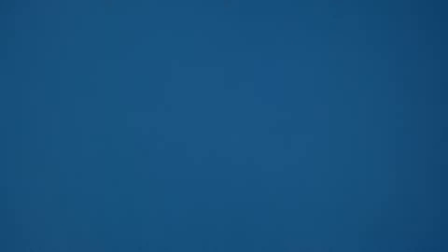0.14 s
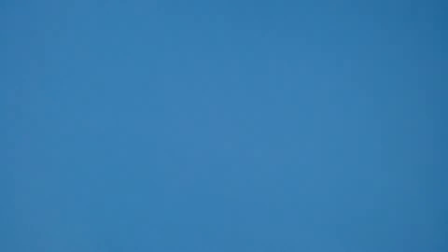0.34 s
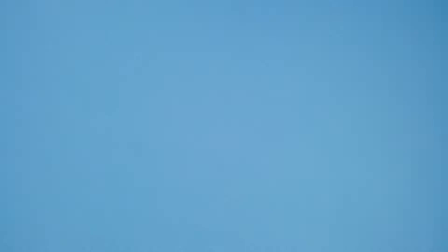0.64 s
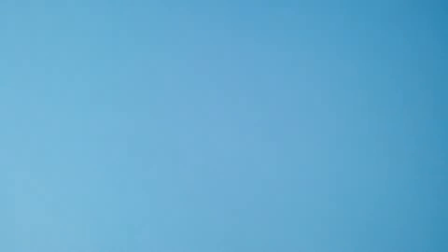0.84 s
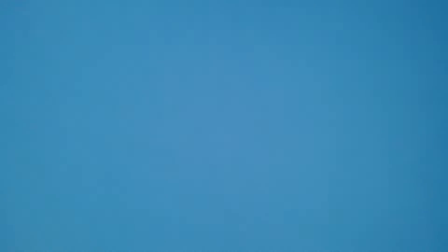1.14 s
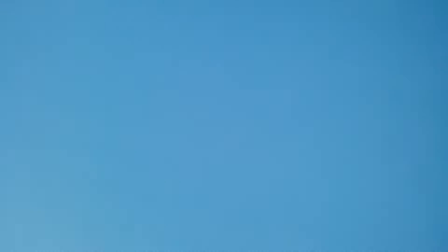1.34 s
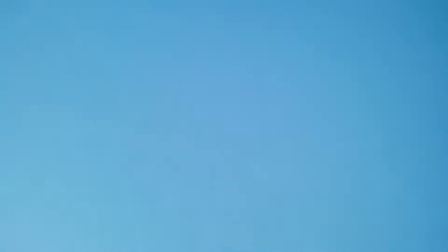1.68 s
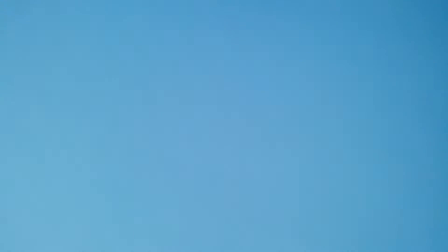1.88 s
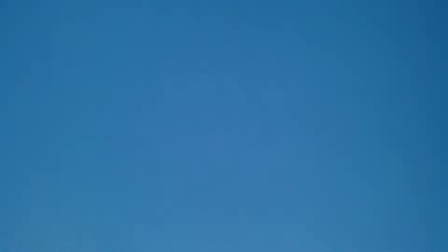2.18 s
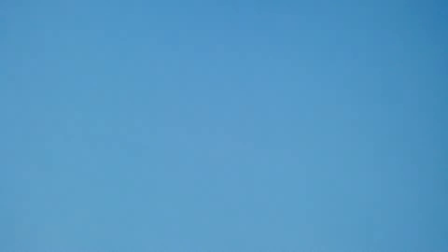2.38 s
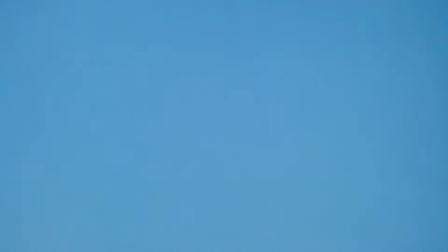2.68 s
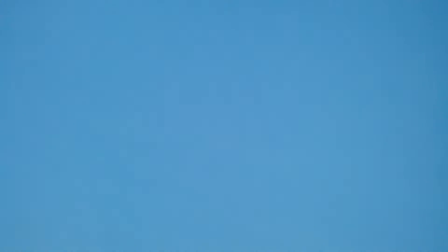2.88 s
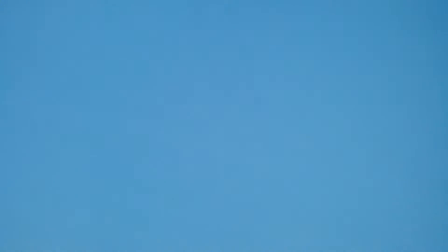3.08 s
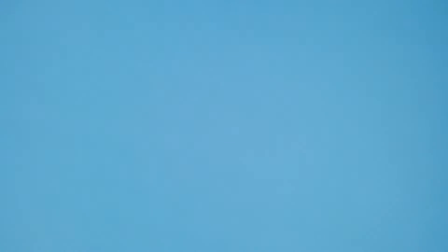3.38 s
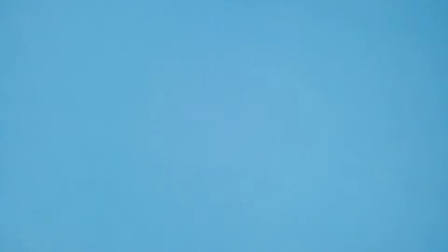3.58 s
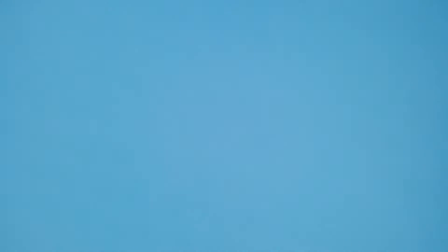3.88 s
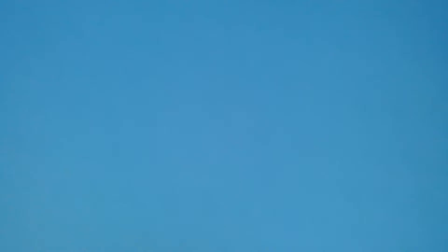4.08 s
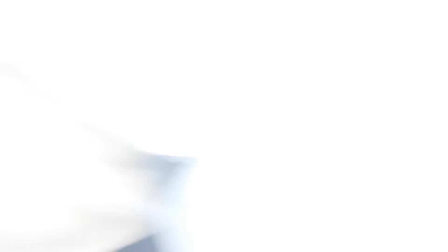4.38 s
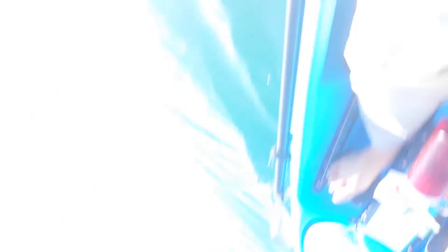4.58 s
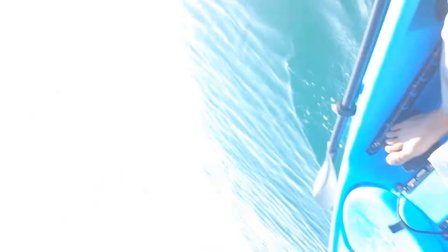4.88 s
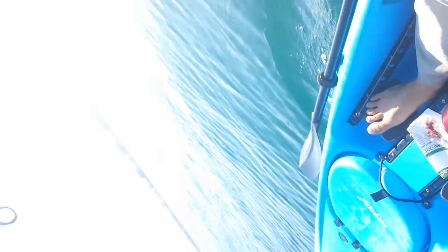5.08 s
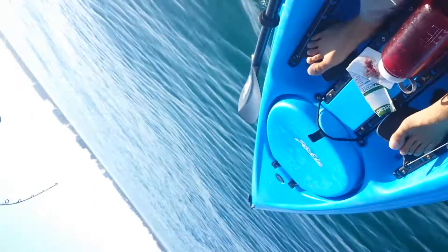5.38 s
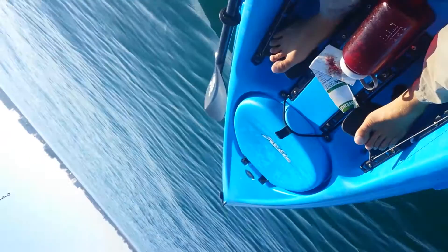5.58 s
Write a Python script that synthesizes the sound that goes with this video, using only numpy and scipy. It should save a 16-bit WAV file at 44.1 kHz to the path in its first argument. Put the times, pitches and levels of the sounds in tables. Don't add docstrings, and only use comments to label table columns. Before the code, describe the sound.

Extremely close handling noise on a waterproof camera: harsh gritty rubbing, sharp cracks and wavering squeaks, a quieter spell, a boomy knock, then another hard squealing stroke. A louder hull thud and a flurry of bumps and reel ticks follow. When the camera is swung clear, the rubbing stops and a fishing reel buzzes briefly, rests, then speeds up again over faint sea rumble. Left microphone dull, right bright.

```python
import sys
import numpy as np
from scipy import signal
from scipy.io import wavfile
from scipy.ndimage import uniform_filter1d

SR = 44100
rng = np.random.default_rng(int(sys.argv[2]) if len(sys.argv) > 2 else 0)


def to_wav(s):
    ch = np.atleast_2d(s).T
    pcm = np.round(np.clip(ch, -1, 1) * 32767)
    wavfile.write(sys.argv[1], SR, pcm.astype(np.int16))


def ratio(d):
    e = np.asarray(d, float) / 20
    return 10 ** e


N = 252894
LIFTED_S = 4.45

# centre in Hz, width in Hz, level in dB.
HOUSING = [(5050, 780, -0.5), (7160, 370, 6), (8650, 1200, 8.5), (9870, 640, 11), (11300, 1400, 3.5),
           (13400, 720, 5.5)]
# frequency in Hz, left minus right in dB.
RUB_LEAN = [(60, -22), (130, 3.5), (290, 32.5), (640, 0), (1410, 7.5), (3100, 11), (6820, -3.5),
            (15000, -33)]
# frequency in Hz, left minus right in dB.
REEL_LEAN = [(290, 12.5), (640, -9.5), (1410, 13.5), (3100, 17), (4600, 17), (5500, 5.5), (6820, -7),
             (15000, -12)]


def evened(x):
    return x / np.sqrt(np.mean(x ** 2) + 1e-20)


def wander(smooth, shape=N):
    return evened(uniform_filter1d(rng.standard_normal(shape), size=smooth))


def read(points, hz):
    f, value = np.transpose(points)
    return np.interp(np.log(hz + 1), np.log(f + 1), value)


def curves(rows, t):
    s, *columns = np.transpose(rows)
    return [np.interp(t, s, c) for c in columns]


def together(*levels_db):
    return 10 * np.log10(sum(ratio(2 * db) for db in levels_db) + 1e-12)


def add(mix, s, sound):
    part = mix[:, round(s * SR):][:, :sound.shape[1]]
    part += sound[:, :part.shape[1]]


def sides(pan_db):
    lean = ratio(np.array([pan_db, -pan_db]) / 2)
    return lean / np.sqrt((lean ** 2).mean(0))


def colour(x, tone, balance, peaks=()):
    hz = abs(np.fft.fftfreq(2048, 1 / SR))
    resonances = sum(ratio(db) / (1 + (2 * (hz - f) / w) ** 2) for f, w, db in peaks)
    gain = ratio(read(tone, hz)) * (1 + resonances)
    log_gain = np.log(gain * sides(read(balance, hz)) + 1e-5)
    taps = np.fft.ifft(np.exp(np.conj(signal.hilbert(log_gain)))).real[:, :1024]
    return signal.oaconvolve(x, taps / np.sqrt(np.mean(gain ** 2)), axes=1)[:, :N]


def grit(per_s, spread_db, smooth):
    size = ratio(spread_db * np.minimum(rng.exponential(1, N), 4)) * (rng.random(N) < per_s / SR)
    burst = signal.lfilter([1], [1, -.93], size)
    return evened((evened(burst) + smooth) * rng.standard_normal((2, N)))


def patchy(x, depth_db, sway_db=0):
    hz, _, z = signal.stft(x, SR, nperseg=512)
    field = rng.standard_normal((z.shape[2], z.shape[1])).T
    field = evened(uniform_filter1d(uniform_filter1d(field, size=6, axis=0), size=9, axis=1))
    grasp, damp = wander(10, (2, z.shape[2]))
    off = (hz[:, None] - HOUSING[0][0]) / 800
    sway = (1.6 * off * grasp + .6 * damp) * np.exp(-off ** 2)
    return signal.istft(z * ratio(depth_db * field + sway_db * sway), nperseg=512)[1][:, :N]


def rub(scrape_db):
    # frequency in Hz, level in dB per Hz.
    rub_tone = [(500, -16), (875, -15), (1900, -12), (2400, -17.5), (3270, -15.5), (5110, 0), (7860, -8),
                (14500, -3)]
    # time in seconds, pressure in dB.
    drags = [
        [(.14, -56), (.2, -33), (.4, -37), (.664, -30), (.84, -36), (.98, -25), (1.14, -33), (1.2, -53)],
        [(1.17, -88), (1.3, -42.5), (1.38, -37), (1.46, -41), (1.6, -61)],
        [(2.52, -105), (2.7, -49.5), (2.8, -35.5), (2.97, -35.5), (3.15, -31), (3.21, -32), (3.39, -31.5),
         (3.415, -65)],
    ]
    # time in seconds, pressure in dB.
    hand_rest = [(0, -51), (1.2, -37), (1.8, -52), (2.14, -46.5), (2.45, -49.5), (2.5, -54.5), (3.3, -41.5),
                 (3.45, -44), (3.8, -49), (3.9, -49), (4.44, -46.5), (4.48, -85), (4.575, -94)]
    drag_bright_db, hand_bright_db, scrape_bright_db = 0.5, -7, -15
    body_level_db, body_share = -42.5, 0.72
    hand_body_db = 3
    hand_left_db = 5.5

    t = np.arange(N) / SR
    scrape_db = scrape_db + 1.1 * wander(130)
    drag_db = together(*(np.interp(t, *np.transpose(r), left=-120, right=-120) for r in drags))
    grip_db = curves(hand_rest, t)[0]
    hand_db = together(grip_db, scrape_db)
    press_db = together(drag_db, hand_db)
    bright_db = together(drag_db + drag_bright_db, grip_db + hand_bright_db, scrape_db + scrape_bright_db)
    bright_db -= press_db
    body_db = np.minimum(body_level_db + body_share * (press_db + 33) - press_db, 8)
    body_db += together(drag_db, hand_db + hand_body_db) - press_db
    flutter_db = 1.27 * wander(500)

    friction = grit(per_s=170, spread_db=33.0, smooth=12.0)
    sound = patchy(colour(friction, rub_tone, RUB_LEAN, HOUSING), 3.48, sway_db=2)
    body = signal.sosfilt(signal.butter(4, 3000, "low", fs=SR, output="sos"), sound)
    middle = signal.sosfilt(signal.butter(4, [3000, 7000], "band", fs=SR, output="sos"), sound)
    bright = signal.sosfilt(signal.butter(4, 7000, "high", fs=SR, output="sos"), sound)
    mix = evened(middle) + ratio(bright_db + 2.5) * evened(bright) + ratio(body_db + 0.48) * evened(body)
    covered = ratio([[0], [-hand_left_db]] * ratio(2 * (hand_db - press_db)))
    return ratio(press_db + flutter_db + 2.0) * covered * mix * (t < hand_rest[-1][0])


def scuffs(t):
    # start in seconds, length in seconds, place of the peak 0-1, scrape in dB, thump in dB.
    moves = [(0, 0.058, 0, -30, -27.5), (0.094, 0.032, 0.43, -36.5, -39), (0.248, 0.11, 0.88, -29, -42),
             (0.357, 0.024, 0.84, -27, -39.5), (1.657, 0.11, 0.5, -50.5, -50),
             (1.707, 0.038, 0.4, -63, -43), (2.184, 0.039, 0, -28, -29.5), (2.207, 0.075, 0.26, -39, -39),
             (2.267, 0.047, 0.86, -34, -63), (2.304, 0.078, 0.68, -32, -43), (2.373, 0.069, 0.85, -36, -63),
             (3.82, 0.052, 0.82, -34, -74), (3.887, 0.07, .6, -40.5, -67), (3.954, 0.078, 0.04, -36, -38),
             (4.019, 0.074, 0.76, -26.5, -22.5), (4.089, 0.18, 0.19, -25, -29.5),
             (4.198, 0.056, 0.85, -22, -24), (4.246, 0.11, 0.4, -34.5, -32.5),
             (4.325, 0.057, 0.48, -27.5, -29.5), (4.405, 0.064, 0.75, -41.5, -38),
             (4.499, 0.031, 0.17, -50, -42.5)]
    roundness = 1.27
    scrape, thump = np.zeros((2, len(t))) + 1e-12
    for start, length, peak, scrape_db, thump_db in moves:
        corners = start + length * np.array([0, np.clip(peak, .02, .98), 1])
        power = np.sin(np.pi / 2 * np.interp(t, corners, [0, 1, 0])) ** (2 * roundness)
        scrape += power * ratio(2 * scrape_db)
        thump += power * ratio(2 * thump_db)
    return 10 * np.log10([scrape, thump])


def squeak(rows):
    t = np.arange(rows[0][0], rows[-1][0], 1 / SR)
    hz, db = uniform_filter1d(curves(rows, t), size=300, mode="nearest")
    wobble, grip = wander(120, len(t)), wander(170, len(t))
    turns = np.cumsum(hz * (1 + .02 * wobble)) / SR
    octave = .1 + 3.2 / (1 + ((2 * hz - 5150) / 450) ** 2)
    octave += .3 * np.clip(np.gradient(hz) * SR / 12000, 0, 1)
    half = 0.39 / (1 + ((hz - 2650) / 250) ** 2)
    tone = np.sin(2 * np.pi * turns) + octave * np.sin(4 * np.pi * turns) + half * np.sin(np.pi * turns)
    tone += (.12 + half) * np.sin(3 * np.pi * turns)
    tone += half * np.sin(5 * np.pi * turns)
    tone += .3 * np.sin(2 * np.pi * 1.14 * turns) * (wobble > -.3)
    level = ratio(db + 3.5 * np.minimum(grip, 1.5) - 8 * np.clip(-grip - .5, 0, 1))
    return rows[0][0], sides(17.0)[:, None] * level * tone * signal.windows.tukey(len(t), .05)


def snap(s, db, hz):
    # centre in Hz, left minus right in dB.
    snap_lean = [(1900, 18), (5000, 8), (9000, -31.5)]
    crack = .4 * rng.standard_normal((2, 500)) * ratio(-60 * np.arange(500) / SR / .005)
    crack[:, 0] = 1
    band = [min(hz / 2.6, 2200), min(hz * 1.8, 12000)]
    wide = signal.lfilter(*signal.butter(2, band, "band", fs=SR), crack)
    ring = signal.lfilter(*signal.iirpeak(min(hz, 15000), 2.5, SR), crack)
    both = ring + .22 * wide
    return s + .0007, sides(read(snap_lean, hz))[:, None] * ratio(db + 4) * both / abs(both).max()


def knock(s, db, hz, t60, pan_db):
    # ratio to the ring, level in dB, share of the decay time.
    hull_modes = [(1, 14, 0.42), (2.1, -2, 0.4), (4.1, -28.5, 0.11), (7, -34.5, 0.28), (11, -13, 0.244)]
    dull_db_per_khz = 5.0
    t = np.maximum(np.arange(6000) / SR - np.array([[.0004], [0]]), 0)
    settle, contact = (.63, .58) if hz < 125 else (.97, .08)
    turns = settle * hz * t + contact * (1 - np.exp(-2.4 * hz * t))
    bend = 1.6 if hz < 200 else 1
    ring = 0
    for k, mode_db, share in hull_modes:
        fade_db = 60 * (t / (t60 * share)) ** bend
        ring = ring + ratio(mode_db - dull_db_per_khz * k * hz / 1000 - fade_db) * np.sin(2 * np.pi * k * turns)
    seat = 1 - np.exp(-9 * hz * t)
    way = -1 if hz > 400 else 1
    return s, way * sides(pan_db)[:, None] * ratio(min(db - 2.5, -2.2)) * ring * seat


def pawl_hits():
    # time in seconds, peak in dB.
    creep = [(3.765, -1.5), (3.797, -3.5), (3.84, -2.5), (4.104, -6), (4.1157, -5.5), (4.124, -17.5),
             (4.1297, -5.5), (4.136, -3.5), (4.1433, -4.5), (4.1505, -7), (4.1565, -5), (4.1659, -14),
             (4.1766, -14), (4.1857, -5.5), (4.2005, -17), (4.219, -5), (4.234, -22.5), (4.2505, -7),
             (4.268, -5), (4.2875, -6.5), (4.3095, -5), (4.404, -11.5)]
    # time in seconds, peak in dB.
    creep_after = [(4.5808, -17), (4.5948, -14), (4.602, -15), (5.2649, -21.5), (5.28, -17), (5.296, -19.5),
                   (5.309, -19), (5.32, -13), (5.33, -20), (5.337, -15.5), (5.3462, -15), (5.355, -18.5),
                   (5.3625, -15.5), (5.3697, -16), (5.378, -16), (5.386, -14), (5.392, -16), (5.398, -20),
                   (5.4013, -12.5), (5.41, -15), (5.4217, -15), (5.4321, -15.5), (5.443, -24),
                   (5.4593, -17), (5.4743, -32), (5.4777, -24), (5.495, -15), (5.508, -13.5),
                   (5.521, -16.5), (5.5312, -11), (5.5399, -14.5), (5.547, -8.5), (5.5547, -13.5),
                   (5.6406, -13), (5.6477, -16.5), (5.6577, -15), (5.6789, -18), (5.688, -28), (5.695, -39)]
    # time in seconds, peak in dB.
    running = [(4.6083, -13), (4.6132, -13), (4.6179, -11), (4.6227, -13), (4.6267, -9), (4.6335, -11),
               (4.6381, -13), (4.6441, -14), (4.6506, -15), (4.6556, -9), (4.6615, -4), (4.6663, -8),
               (4.6717, -10), (4.6768, -9), (4.6819, -10), (4.6869, -14), (4.6921, -10), (4.7024, -10),
               (4.7074, -7), (4.7127, -9), (4.7168, -12), (4.7228, -14), (4.7258, -19), (4.7292, -17),
               (4.7333, -13), (4.7367, -15), (4.7444, -15), (4.749, -17), (4.7545, -20), (4.7586, -16),
               (4.7642, -14), (4.7695, -15), (4.7763, -23), (4.782, -24), (4.7884, -31), (4.792, -25),
               (5.5601, -16), (5.5653, -16), (5.5698, -12), (5.5745, -13), (5.5788, -12), (5.5829, -11),
               (5.5908, -14), (5.5946, -14), (5.5985, -16), (5.604, -15), (5.6082, -11), (5.6127, -15),
               (5.6169, -11), (5.6222, -14), (5.6273, -11), (5.6325, -16), (5.636, -22)]
    hits = np.zeros(N)
    for s, db in creep + creep_after + running:
        hits[round(s * SR)] = ratio(db)
    return hits


def clicker(hits):
    # frequency in Hz, level in dB per Hz.
    tone_before = [(1180, -79), (2000, -23.5), (4420, -14), (5190, -4.5), (7450, 1), (8240, -7.5),
                   (10800, 3.5), (15000, -11.5)]
    tone_after = [(1350, -87), (2300, -31.5), (3950, -11.5), (4700, -1.5), (6630, 0.5), (7460, 4.5),
                  (9080, -3), (14500, -3)]
    # frequency in Hz, left minus right in dB.
    lean_before = [(60, -26), (240, -21.5), (950, 12.5), (3770, 6), (15000, -40.5)]
    # frequency in Hz, level in dB, t60 in seconds, left minus right in dB.
    spool_modes = [(5215, -25.5, 0.028, 4.5), (7710, -31, 0.044, -10.5), (7240, -28, 0.032, -7.5),
                   (2930, -47, 0.05, 10.5), (3750, -47.5, .025, 10.5)]
    t = np.arange(12000) / SR
    bounced = hits + .35 * np.roll(hits, 150) + .1 * np.roll(hits, 390)
    shape = .6 * ratio(-60 * t / .004) + .6 * ratio(-60 * t / .01) + .08 * ratio(-60 * t / .022)
    shape += 0.0014 * ratio(-60 * t / .5)
    shape *= 1 - np.exp(-t / .0003)
    rattle = signal.oaconvolve(bounced, shape)[:N] * rng.standard_normal((2, N))
    after = np.arange(N) > LIFTED_S * SR
    out = ratio(-8.0) * colour(rattle * ~after, tone_before, lean_before)
    out += ratio(1.0) * colour(rattle * after, tone_after, REEL_LEAN)
    for hz, db, t60, pan_db in spool_modes:
        struck = rattle * np.where(after, 1, 0.029 * (pan_db < 0))
        mode = ratio(db - 60 * t / t60) * np.sin(2 * np.pi * hz * t)
        out += sides(pan_db)[:, None] * signal.oaconvolve(struck, mode[None], axes=1)[:, :N]
    return out


def rings(hits):
    # frequency in Hz, level in dB, t60 in seconds, left minus right in dB.
    long_modes = [(4480, -24.5, 0.31, 23), (7300, -30.5, .2, -18)]
    fill_s = .035
    growth = .8
    t, out = np.arange(N) / SR, np.zeros((2, N))
    struck = hits * np.where(t > LIFTED_S, 1, .02)
    driven = np.minimum(uniform_filter1d(1. * (hits > 0), size=600) * 300, 1)
    for hz, db, t60, pan_db in long_modes:
        store = ratio(-120 * t[:20000] / t60) * (1 - np.exp(-t[:20000] / fill_s))
        energy = abs(signal.oaconvolve(struck, store)[:N])
        shake, swell = evened(uniform_filter1d(rng.standard_normal((2, N)), size=450, axis=1))
        tone = np.sin(2 * np.pi * np.cumsum(hz + 45 * driven * shake) / SR)
        tone *= ratio(db + 4 * driven * np.minimum(swell, 1))
        heard = np.where(t > LIFTED_S, 1, pan_db < 0)
        out += sides(pan_db)[:, None] * energy ** growth * tone * heard
    return out


def line(hits):
    # time in seconds, level in dB.
    runs = [
        [(4.57, -66), (4.58, -50), (4.612, -39.5), (4.758, -32), (4.83, -68)],
        [(5.252, -51), (5.262, -38), (5.383, -32), (5.477, -40.5), (5.6, -33.5), (5.707, -53), (5.72, -86)],
    ]
    # frequency in Hz, level in dB per Hz.
    whirr_tone = [(600, -61.5), (807, -45.5), (900, -6.5), (1200, -12), (1720, 0.5), (2180, -19.5),
                  (3120, -17), (5280, -120)]
    pulse = 0.34
    t = np.arange(N) / SR
    friction = grit(per_s=360, spread_db=1.5, smooth=2.5)
    whirr = evened(patchy(colour(friction, whirr_tone, REEL_LEAN), 3.7))
    jolt = signal.oaconvolve(1. * (hits > 0), ratio(-60 * t[:2000] / 0.028))[:N]
    whirr = whirr * (1 - pulse + 2 * pulse * jolt)
    return whirr * sum(ratio(curves(r, t)[0] - 1.0) * (t > r[0][0]) * (t < r[-1][0]) for r in runs)


def sea(thump_db):
    # frequency in Hz, level in dB per Hz.
    rumble_tone = [(18, -8), (30, -13), (85, 0.5), (200, -4.5), (300, -13.5), (600, -41.5)]
    slosh_tone = [(150, -16), (300, 0), (480, -10.5), (700, -9.5), (1200, -27)]
    hiss_tone = [(290, -35.5), (500, -9.5), (1350, -9), (1720, -7), (2800, -18.5), (5090, -12),
                 (14000, -19), (15000, -12.5)]
    # time in seconds, level in dB.
    rumble_level = [(0, -51.5), (.36, -45), (.7, -52.5), (1.3, -44.5), (2.2, -48), (2.5, -50), (3.8, -47.5),
                    (4.4, -44), (4.55, -47), (5.1, -61), (5.73, -51)]
    hiss_level = [(4.5, -63.5), (4.96, -65.5), (5.2, -72.5), (5.7, -59.5)]
    slosh_db, slosh_lifted_db, thump_slosh_db = -4, -10, -0.5
    thump_left_db = 6
    t = np.arange(N) / SR
    sea_db = curves(rumble_level, t)[0]
    thump_db = thump_db + 4.0 * np.clip(wander(500), -3, 1.5)
    level_db = together(sea_db, thump_db)
    sea_slosh_db = sea_db + np.where(t < LIFTED_S, slosh_db, slosh_lifted_db)
    upper_db = together(sea_slosh_db, thump_db + thump_slosh_db) - level_db
    shared, own, wet = rng.standard_normal(N), rng.standard_normal((2, N)), rng.standard_normal((2, N))
    lumps = ratio(2.23 * wander(1500))
    rumble = colour(lumps * (1.57 * shared + own), rumble_tone, [(60, 1.5), (300, 2.5)])
    hollow = [(478, 81, 0.93)]
    slosh = colour(lumps * (wet + .5 * shared), slosh_tone, [(300, 4.3), (700, 2.5)], hollow)
    hiss = patchy(colour(rng.standard_normal((2, N)), hiss_tone, RUB_LEAN), 1.5)
    low = evened(rumble) + ratio(upper_db) * evened(slosh)
    low = low * ratio([[0], [-thump_left_db]] * ratio(2 * (thump_db - level_db)))
    return ratio(level_db + 1.5) * low + ratio(curves(hiss_level, t)[0] + 8.5) * evened(hiss)


def scene():
    # time in seconds, pitch in Hz, level in dB.
    squeaks = [
        [(.37, 1850, -53), (.4, 1720, -42.5), (.43, 1800, -47), (.46, 2035, -32.5), (.506, 1480, -44),
         (.55, 1608, -42), (.6, 2195, -37), (.62, 2580, -38.5), (.65, 2690, -50.5)],
        [(.675, 2207, -71), (.69, 1940, -39), (.72, 1870, -37.5), (.755, 2060, -34), (.79, 1720, -42),
         (.83, 1370, -45), (.855, 1233, -49)],
        [(.855, 1217, -32), (.885, 1505, -45), (.91, 2064, -33), (.97, 2700, -41.5), (1.005, 2174, -35.5),
         (1.048, 1933, -39), (1.085, 2120, -32.5), (1.11, 1940, -29.5), (1.135, 1316, -40)],
        [(1.35, 1990, -46), (1.39, 2225, -38), (1.43, 1927, -39.5), (1.48, 2004, -40.5), (1.55, 2040, -48)],
        [(1.44, 1420, -55), (1.47, 1303, -45), (1.505, 1208, -40)],
        [(2.83, 2707, -54), (2.865, 2200, -35.5), (2.885, 1980, -61), (2.91, 1860, -39.5), (2.935, 2170, -47),
         (2.965, 2180, -42)],
        [(3.04, 2506, -50), (3.085, 2847, -39.5), (3.12, 2590, -39), (3.15, 2250, -47), (3.184, 2040, -30.5),
         (3.215, 2280, -52), (3.245, 2140, -28.5)],
        [(3.245, 2150, -59), (3.27, 2290, -36), (3.3, 1950, -41), (3.33, 2080, -39), (3.36, 1847, -31.5),
         (3.385, 1440, -37), (3.392, 1990, -34), (3.402, 1970, -24)],
    ]
    # time in seconds, pitch in Hz, level in dB.
    whines = [
        [(4.6, 1287, -50), (4.625, 1800, -37), (4.67, 1500, -49), (4.7, 1700, -41), (4.745, 1764, -32),
         (4.78, 1360, -46)],
        [(5.34, 878, -49), (5.36, 891, -39), (5.385, 1097, -45), (5.41, 1150, -49)],
        [(5.53, 803, -43), (5.554, 1198, -51), (5.572, 1766, -26), (5.585, 1800, -48), (5.605, 1806, -28),
         (5.626, 1550, -41.5), (5.655, 1270, -40)],
    ]
    # time in seconds, peak in dB,
    # centre in Hz.
    snaps = [(0.0194, -22, 4960), (0.0673, -31, 6500), (0.127, -29, 4000), (0.1795, -29, 1400),
             (0.2135, -17, 5000), (0.277, -20, 8400), (0.332, -29, 1400), (0.359, -22, 4800),
             (0.4569, -20, 5290), (0.5477, -18, 5200), (0.756, -17, 6800), (1.796, -34, 1500),
             (1.886, -34, 4500), (2.1845, -21, 1100), (2.187, -19, 900), (2.192, -24, 800),
             (2.194, -22, 1000), (2.1955, -22, 4800), (2.199, -24, 3000), (3.148, -11, 5200),
             (3.934, -32, 4500), (4.109, -26, 700), (4.156, -22, 750), (4.2025, -16, 5000),
             (4.233, -21, 700), (4.349, -24, 850), (4.3575, -21, 900), (0.1042, -23, 5350),
             (0.1161, -19, 7260), (0.3774, -18, 1200), (0.3835, -8, 4910), (0.5681, -9, 5040),
             (0.685, -6, 8000), (0.7377, -6, 5700), (0.8165, -10, 5010), (1.053, -9, 4400),
             (1.122, -24, 3200), (1.3021, -28, 4940), (1.3335, -23, 2600), (1.4647, -29, 3000),
             (1.727, -34, 2600), (1.6132, -26, 5110), (1.7759, -21, 1920), (1.9535, -26, 1910),
             (2.1565, -28, 5100), (2.1824, -18, 5140), (2.872, -22, 3600), (2.9168, -18, 5180),
             (3.0709, -11, 4000), (3.1368, -8, 5000), (3.225, -18, 3000), (3.3508, -12, 5260),
             (3.4067, -11, 7210), (3.4316, -10, 7800), (3.9574, -22, 6000), (4.0296, -11, 4580),
             (4.0647, -9, 7440), (4.4593, -22, 5000), (4.5052, -31, 5230), (4.8755, -39, 4920),
             (5.03, -39, 4360), (5.1452, -46, 5140)]
    # time in seconds, peak in dB, ring in Hz, t60 in seconds,
    # left minus right in dB.
    knocks = [(1.698, -28, 282, 0.037, 1), (1.819, -29, 336, 0.15, 4), (2.1824, 1, 98.6, 0.048, 16.5),
              (2.229, -26, 430, 0.051, 10), (2.24, -34, 60, 0.07, 3), (2.2247, -27, 110, 0.044, 8),
              (3.9578, 14, 104, 0.06, 17.5), (4.0312, -6.5, 480, 0.039, 15.5),
              (4.0305, -16, 118, 0.045, 6.5), (4.072, -18.5, 75, 0.026, 0),
              (4.0647, -9.5, 440, 0.025, 10.5), (4.1, -25, 110, 0.043, 21), (4.157, -21.5, 94, 0.032, 24),
              (4.204, -24, 120, 0.017, 18), (4.229, -10, 70, 0.019, 22), (4.229, -22, 480, 0.032, 28),
              (4.346, -29, 430, 0.033, 13), (4.3583, -31, 480, 0.15, 1.5), (4.419, -28.5, 213, 0.049, 7),
              (4.44, -29, 800, 0.022, 6), (2.859, -37, 400, .05, 5), (1.817, -35.5, 180, 0.083, 8),
              (3.978, -32.5, 62, 0.17, 7.5), (4.4598, -3.5, 480, 0.042, 15.5),
              (4.46, -6.5, 131, 0.015, 21.5), (4.615, -34.5, 76, 0.041, 12), (4.89, -47, 470, 0.063, 3)]
    scrape_db, thump_db = scuffs(np.arange(N) / SR)
    hits = pawl_hits()
    mix = rub(scrape_db) + clicker(hits) + rings(hits) + line(hits) + sea(thump_db)
    for rows in squeaks + whines:
        add(mix, *squeak(rows))
    for row in snaps:
        add(mix, *snap(*row))
    for row in knocks:
        add(mix, *knock(*row))
    return mix


def roll_off(x):
    return signal.sosfilt(signal.butter(12, 15760, fs=SR, output="sos"), x)


def record(dry):
    soft = .94 * np.tanh(dry / .94)
    hz, t, z = signal.stft(soft, SR, nperseg=1024)
    hz = hz[:, None]
    near = uniform_filter1d(abs(z) ** 2, size=7, axis=1)
    hiss = near[:, hz[:, 0] > 4000].mean(axis=(0, 1))
    floor_db = np.where(hz < 950, np.where(t < LIFTED_S, -8.5, -14.0), -13.5)
    masked = (near < ratio(2 * floor_db) * hiss) & (hz > 220) & (hz < 4200)
    soft = signal.istft(z * np.where(masked, .05, 1), SR, nperseg=1024)[1][:, :N]
    lowpass = signal.firwin(255, 14500, window=("kaiser", 8), fs=SR)
    cut = signal.oaconvolve(soft, lowpass[None], "same")
    top = soft - cut
    sudden = uniform_filter1d(top ** 2, 90) / (uniform_filter1d(top ** 2, 1500) + 1e-12)
    return roll_off(cut + .15 * np.clip(sudden - 3.0, 0, 1) * top)


dry = scene()
out = record(dry)
to_wav(out)
```